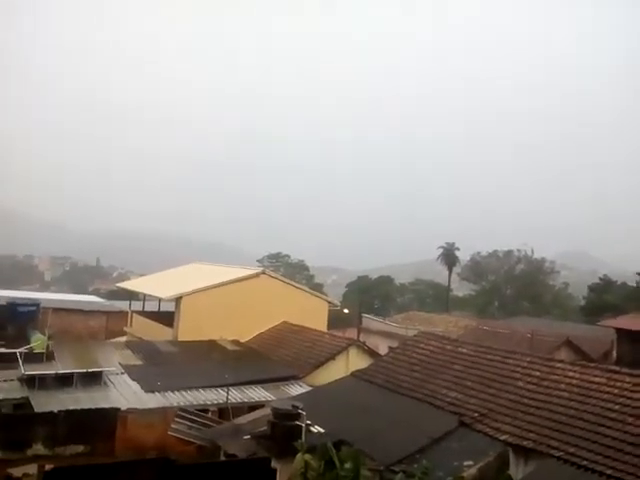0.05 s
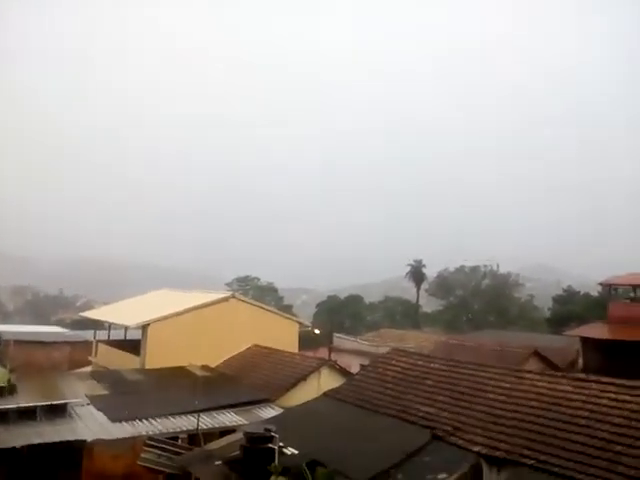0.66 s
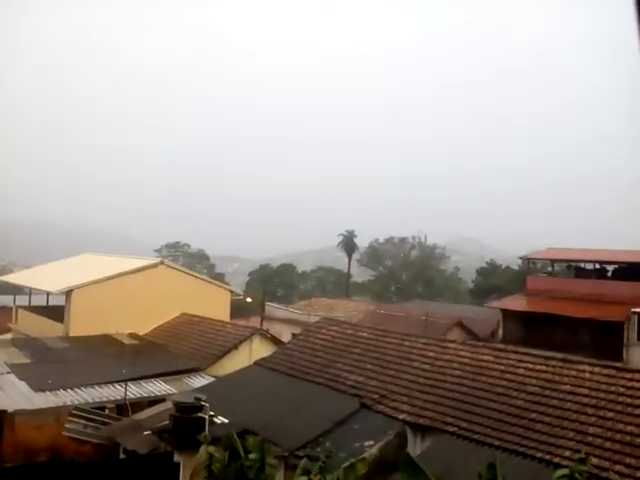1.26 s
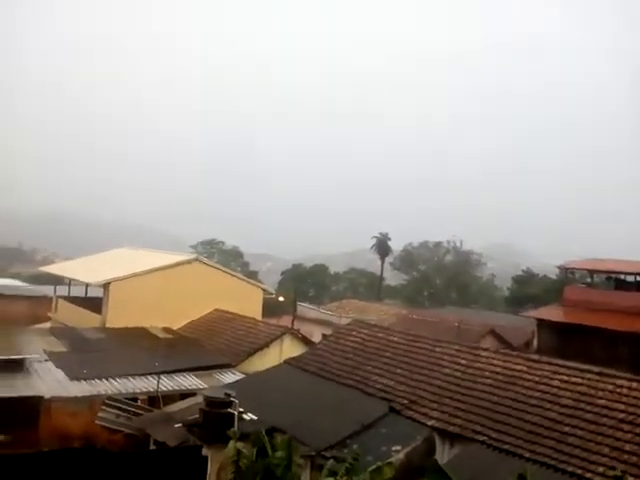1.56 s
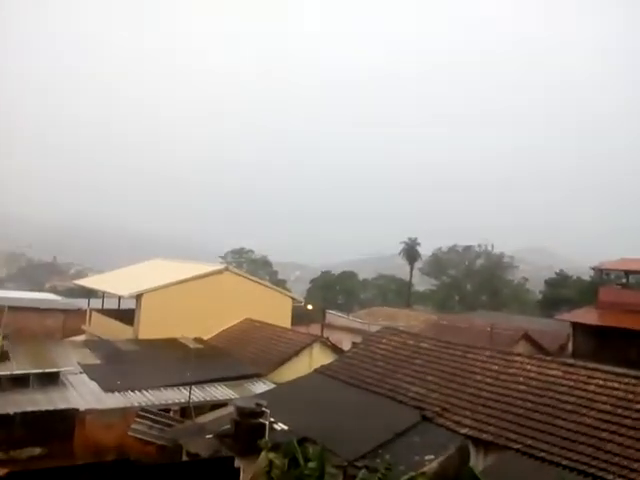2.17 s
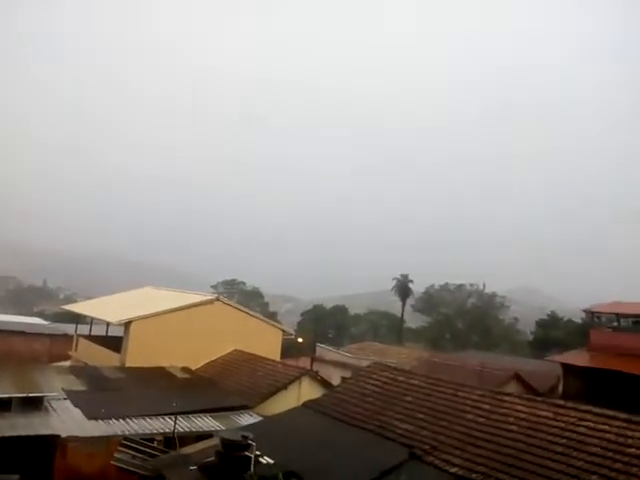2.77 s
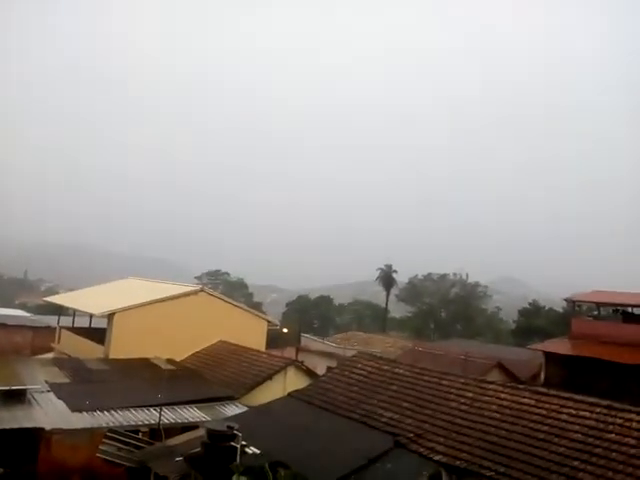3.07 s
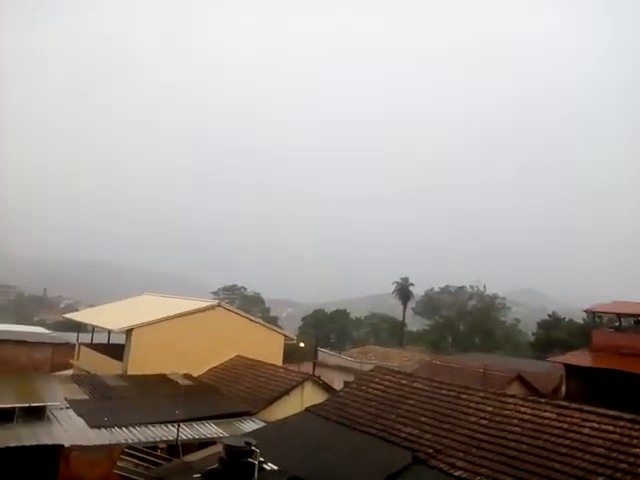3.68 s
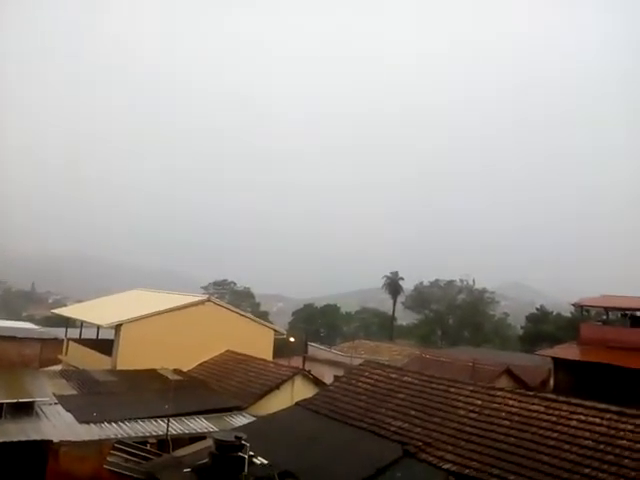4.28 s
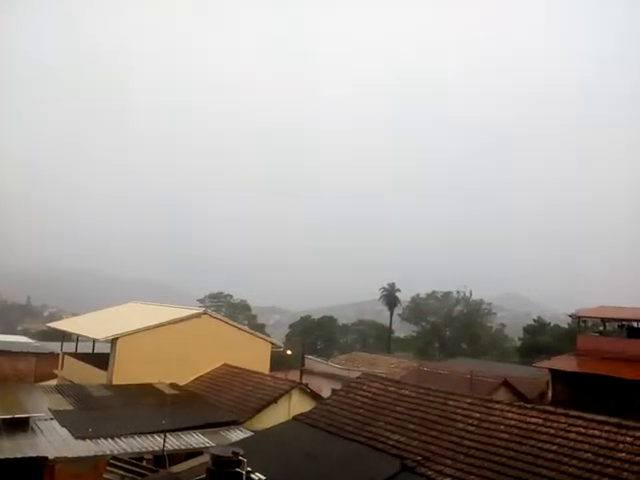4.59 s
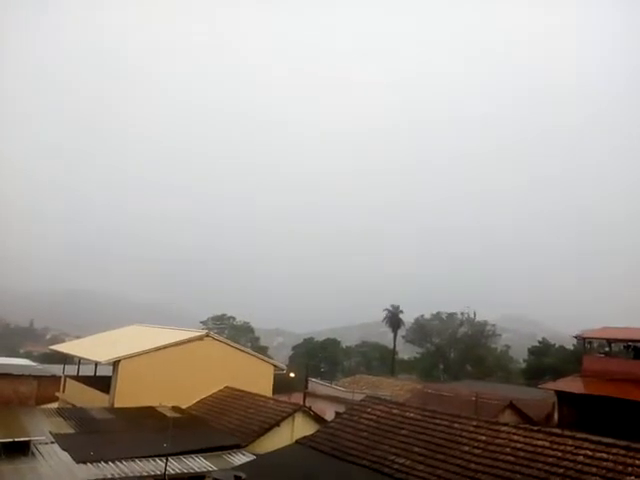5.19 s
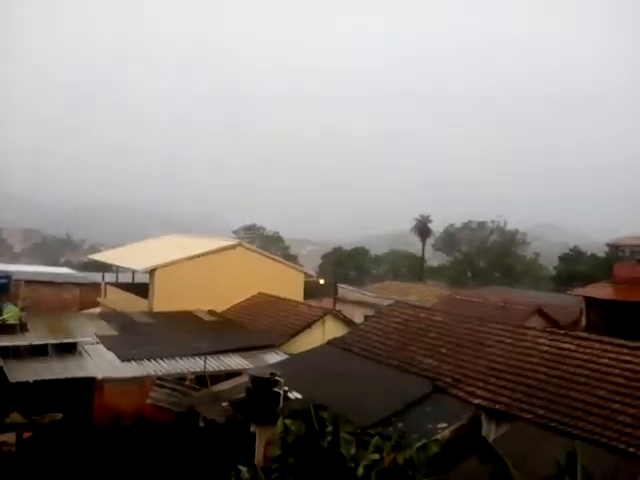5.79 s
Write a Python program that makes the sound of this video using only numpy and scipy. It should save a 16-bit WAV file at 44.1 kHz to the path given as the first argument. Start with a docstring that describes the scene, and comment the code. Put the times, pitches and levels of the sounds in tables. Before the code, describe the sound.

A downpour washes over rooftops all around a handheld microphone, with drops drumming and faintly ringing on sheet roofing. From about one second, clusters of low, hollow knocks and short scrapes come from the left, along with grip rumble and two sharp finger ticks on the right. After three seconds the handling quiets, leaving rain, splashes, one tiny squeak and several heavy drips.

```python
"""Heavy rain on tiled and sheet roofs, heard by a handheld camera with two microphone openings (ports).
Far drops blend into a dense wash; nearer ones patter, ring the roofs and splash up spray,
with a few fat drips and one brief squeak. Something hollow bumps, rattles and scrapes, mostly near the
left port, and the grip rumbles. Fingers tick and brush at the right port, and a limiter turns the
whole sound down for a moment at the loud ticks."""
import sys
import numpy as np
from scipy import signal
from scipy.fft import rfft, irfft
from scipy.io import wavfile
from scipy.ndimage import uniform_filter1d, minimum_filter1d

SR = 44100
rng = np.random.default_rng(int(sys.argv[2]) if len(sys.argv) > 2 else 0)


def generate_wav(sig):
    """Save sig (samples, or channels by samples) to the path in sys.argv[1] as 16-bit PCM at SR."""
    pcm = np.round(np.clip(np.atleast_2d(sig).T, -1, 1) * 32767).astype(np.int16)
    wavfile.write(sys.argv[1], SR, pcm)


N = 266364

# The tone of the rain. Each row: frequency in Hz, left level in dB, right level in dB.
RAIN_TONE = [(30, -87, -77.5), (120, -65, -65), (330, -59.5, -60), (704, -66, -65.5), (807, -63.5, -60.5),
             (1060, -62, -63.5), (1410, -63.5, -64), (1750, -66, -63), (1970, -65, -63), (2240, -61.5, -65),
             (2300, -63, -66.5), (2830, -63, -67), (3980, -66, -66.5), (4570, -67.5, -70), (4900, -74, -68),
             (6000, -73.5, -68.5), (6450, -72, -68.5), (6810, -71.5, -69.5), (8060, -88, -79),
             (9700, -90, -84), (13500, -94, -96.5), (15000, -90, -87.5)]
# How alike the ports hear the rain. Each row: frequency in Hz, likeness from 0 to 1, left lead in radians.
PORT_LIKENESS = [(60, 0.96, 4.5), (283, 0.86, 3), (440, 0.8, 2.5), (630, 0.55, 2), (820, 0.85, 2.5),
                 (1180, 0.16, 1.4), (1265, 0, 0.46), (1600, 0.4, -0.4), (1990, 0.36, 0.4),
                 (2380, 0.34, -2.5), (3150, 0.06, -3.5), (3700, 0.23, -4.5), (5000, 0.03, -9)]
# Ringing sheet roofs. Each row: pitch in Hz, width of the note in Hz, level in dB, balance in dB.
# A balance above zero means louder on the left.
SHEET_ROOFS = [(2017, 140, -43, 5.5), (2744, 46, -49, 12), (1138, 210, -46.5, 5.5)]
# Runs of drops on the nearest sheet. Each row: middle in seconds, level in dB, half length in seconds.
PELT_RUNS = [(1.11, -40, .025), (1.21, -29, .02), (1.415, -36, 0.031)]
# Short hissing surges: splashes of spray, and a few scrapes among the bumps (at 1.353, 1.739 and 2.096 s).
# Each row: middle in seconds, level in dB, half length in seconds, pitch in Hz, gain of that note in dB.
HISS_SURGES = [(0.297, -34, .03, 1900, 3), (0.373, -28, 0.025, 2480, 13), (0.99, -32, 0.0079, 6500, 4),
               (1.353, -25.5, 0.015, 2780, 11), (1.739, -23.5, 0.013, 3170, 1),
               (2.096, -27, 0.079, 2400, -5), (2.128, -41, 0.018, 10500, 6), (2.2, -32, 0.012, 5200, -7),
               (2.264, -23, 0.017, 2850, 5), (2.95, -31, .02, 2700, 1), (3.808, -27.5, 0.015, 3100, -5),
               (3.98, -30, .003, 5800, 0), (4, -25.5, 0.012, 6200, -4), (4.034, -31, .006, 4300, 6),
               (4.282, -30, .02, 3300, -6), (4.498, -26, 0.012, 1600, 12), (4.626, -32, 0.048, 2800, 10),
               (5.14, -28.5, 0.028, 2700, -3), (5.283, -28, 0.019, 2100, 2), (5.35, -29.5, 0.013, 2300, -1),
               (5.42, -30, 0.02, 3900, 2), (5.875, -30, 0.018, 2800, 5)]
# Fat drops. Each row: start in seconds, level in dB, pitch in Hz, seconds to fade by 60 dB, balance in dB.
FAT_DROPS = [(.389, -31, 9100, .04, 5), (4.483, -23, 2300, 0.045, 10), (4.775, -22, 517, 0.047, 12),
             (5.195, -20.5, 2650, .05, 8), (5.288, -23, 2500, .08, 8), (5.822, -22, 2930, 0.13, 12)]
# The path of the squeak. Each row: time in seconds, pitch in Hz.
SQUEAK_PATH = [(3.982, 4550), (3.989, 4550), (3.996, 3450), (4.004, 3200), (4.011, 1200)]
# Blows on the hollow body. Each row: start in seconds, level in dB, rattle fade time in seconds, ring
# against the thud in dB, pitch the struck spot favours in Hz, bright slap in dB, balance in dB.
BLOWS = [(.275, -40, 0.023, -5, 140, -6, -17), (.405, -39.5, 0.07, 3, 157, -12, -1),
         (0.805, -28, 0.053, 5, 225, 1, 24), (0.904, -30.5, 0.064, 6.5, 260, 2, 24),
         (1.003, -23.5, 0.041, -1, 100, -13, 24), (1.268, -23, 0.063, 0.5, 196, -4.5, 26),
         (1.288, -28.5, 0.03, -1, 220, -2, 24), (1.337, -27.5, 0.053, -15, 129, -4, 20),
         (1.362, -32, 0.045, 5, 108, -6, 24), (1.735, -24.5, 0.11, 2, 139, -10, 22),
         (1.751, -28, 0.029, 13, 965, -9, 27), (1.773, -30.5, .025, 7, 144, -14, 20),
         (1.801, -30, 0.051, 8, 900, -2, 22), (2.061, -28, 0.08, 5.5, 173, -7, 24),
         (2.393, -38.5, .02, 4, 147, -14, -4), (2.554, -24.5, 0.06, 5, 230, -4, 20),
         (2.591, -29.5, 0.031, 10.5, 130, -2, 15), (2.619, -32, 0.035, 9.5, 390, -7, 20),
         (2.679, -29.5, 0.02, 1, 327, -7, 20), (2.763, -33, 0.033, -6, 164, -8, 23),
         (3.215, -35, 0.027, 2, 148, -6, -25), (3.376, -38, .08, 7.5, 150, -6, -24),
         (3.931, -49, 0.044, 10, 110, -8, -10), (4.17, -44.5, 0.036, 8.5, 111, -6, -21)]
# The notes of the hollow body. Each row: pitch in Hz, level in dB, seconds to fade by 60 dB.
BODY_NOTES = [(100.2, -5, 0.81), (127.9, 1, 0.56), (154, -1, 0.32), (192, 3.5, 0.19), (226.3, -3, 0.68),
              (270, -11, 0.56), (327, -5, .45), (376, -3, 0.23), (782, -2, 0.25), (968, 1, 0.12),
              (1020, -2, 0.17), (1088, 1, 0.16), (1166, 1, 0.22), (1454, -5, .25)]
# Scrapes among the bumps. Each row: middle in seconds, level in dB, half length in seconds.
SLIDES = [(1.301, -24, .004), (1.337, -22, .005), (1.386, -27, .003), (1.714, -27, 0.0034),
          (1.81, -28, .006), (2.44, -26, .015), (2.575, -22.5, 0.012), (2.607, -30, 0.012),
          (2.665, -30, .009)]
# Finger ticks on the casing. Each row: start in seconds, peak in dB before the limiter.
FINGER_TICKS = [(1.6858, -1.5), (1.6898, -20), (2.3938, 0), (2.4105, -10)]
# Finger brushes. Each row: start in seconds, level in dB, length in seconds.
FINGER_BRUSHES = [(0.196, -24.5, 0.029), (1.8, -30.5, 0.021)]
# The tone of five sounds. Each row: frequency in Hz, level in dB.
HISS_TONE = [(300, -12), (1200, -10), (2200, -2.5), (3100, -0.5), (4200, -3.5), (5000, -8.5), (6600, -4.5),
             (8300, -26.5), (11500, -24.5), (15000, -37)]  # the fizz of spray, hissing scrapes and slaps
THUD_TONE = [(20, -24), (40, -5), (60, -7), (120, -1), (230, 0.5), (310, -7.5), (390, -2.5), (600, -5),
             (1200, -26.5), (4000, -60)]  # the dull part of a bump
CLATTER_TONE = [(150, -33.5), (400, -5), (620, -5), (800, -1.5), (1000, -4.5), (1400, -8.5), (2400, -9.5),
                (4000, -16.5), (8000, -42), (16000, -65)]  # the bright part of a bump
SCRAPE_TONE = [(400, -16), (1300, 0.5), (2400, -9), (3100, 0.5), (4300, -2), (4900, -20), (6500, -7),
               (9000, -41)]  # the body sliding
FINGER_TONE = [(500, -28), (3000, -27), (4100, -3), (5100, 2), (6400, 3), (8000, -24), (9300, -14),
               (13000, -25), (15500, -29)]  # the casing under a fingertip

WAVE_RATES_HZ = (1.1, 9)  # slowest and fastest waves in the spray and on the sheet roofs


def rain():
    """Far drops merge into a wash; near ones patter and ring on tiles. Both reach the two ports."""
    hz = np.fft.rfftfreq(N, 1 / SR)
    swell = gain_of(0.05 * wander(0.27, 12))  # the downpour is almost steady
    near_gain, tile_gain = gain_of(-5), gain_of(-7)
    washes = []
    for _ in range(2):
        tiles = 0
        for ring_hz in np.geomspace(450, 6500, 24):
            ring = 1 / (1 + 1j * 9 * (hz / ring_hz - ring_hz / (hz + 1)))  # a tile rings for a few cycles
            tiles = tiles + rfft(drops(per_s=70, spread_db=1.0)) * ring
        wash = evened(rng.standard_normal(N) + near_gain * drops(per_s=1500, spread_db=1.0))
        washes.append(swell * (wash + tile_gain * irfft(tiles, N)) / np.hypot(1, tile_gain))
    left = rfft(patchy(washes[0], patch_db=1.62, flicker_db=1.0))  # the left port faces the gustier side
    other = rfft(patchy(washes[1], patch_db=0.68, flicker_db=1.34))
    likeness = np.clip(look_up(PORT_LIKENESS, hz), 0, 1)
    lag = np.exp(-1j * look_up(PORT_LIKENESS, hz, column=2))
    right = (likeness * left + np.sqrt(1 - likeness ** 2) * other) * lag
    ports = [left * gain_of(look_up(RAIN_TONE, hz)), right * gain_of(look_up(RAIN_TONE, hz, column=2))]
    return gain_of(-0.5) * np.sqrt(SR / 2) * irfft(np.array(ports), N)


def patchy(x, patch_db, flicker_db):
    """Rain lands in clumps: patches of time and pitch swell, and the treble flickers."""
    hz, _, grid = signal.stft(x, SR, nperseg=512, noverlap=384)  # pitch down the rows, time across
    patches = rng.standard_normal(grid.T.shape).T
    for _ in range(2):
        patches = uniform_filter1d(uniform_filter1d(patches, size=14, axis=1), size=7, axis=0)
    flicker = np.interp(np.linspace(0, N, grid.shape[1]), np.arange(N), wander(0.63, 46))
    treble = np.minimum(hz / 9000, 1)[:, None]
    grid = grid * gain_of(patch_db * evened(patches) + flicker_db * treble * flicker)
    return signal.istft(grid, SR, nperseg=512, noverlap=384)[1][:N]


def sheets():
    """Drops drum on sheet roofs, each with one broad note; the drumming comes in waves and slowly eases."""
    t, out = np.arange(N) / SR, np.zeros((2, N))
    swing_db, ease_db_per_s = 1.5, 2.07
    for hz, width, db, balance_db in SHEET_ROOFS:
        ring = ringing(drops(per_s=350, spread_db=2.5), hz, sharpness=hz / width)
        waves_db = swing_db * wander(*WAVE_RATES_HZ) - ease_db_per_s * (t - t.mean())
        out += panned(balance_db) * gain_of(db + waves_db) * evened(ring)
    return out


def pelts():
    """Runs of drops swell on the nearest sheet and bring out its note."""
    hz, width_hz = 2030, 320
    ring = drops(per_s=1700, spread_db=-1.0)
    for _ in range(2):
        ring = ringing(ring, hz, sharpness=hz / width_hz)
    level = sum(hump(*run) for run in PELT_RUNS)
    return panned(balance_db=8) * level * evened(ring)


def hiss():
    """Mostly on the left, fine spray comes and goes; splashes and a few scrapes hiss in short surges."""
    fizz = np.array([evened(colour(drops(per_s=9000, spread_db=1.5), HISS_TONE)) for _ in range(2)])
    usual_db, swing_db = -43.5, 3.5
    out = fizz * gain_of(usual_db + swing_db * np.tanh(wander(*WAVE_RATES_HZ)))
    for s, db, half, hz, note_db in HISS_SURGES:
        note = gain_of(note_db) * ringing(fizz, hz, sharpness=3.5)
        out += hump(s, db, half) * evened(fizz + note)
    return out * panned(balance_db=6)


def drips():
    """A fat drop rings four close, quickly dying notes; its soft splat rounds off the start."""
    t, out = np.arange(int(.15 * SR)) / SR, np.zeros((2, N))
    soft_start = 1 - np.exp(-t / 0.0033)
    for s, db, hz, fade_s, balance_db in FAT_DROPS:
        pitches = hz + rng.normal(0, 80, size=4)
        phases = rng.uniform(0, 2 * np.pi, size=4)
        ring = sum(np.sin(2 * np.pi * pitch * t + phase) for pitch, phase in zip(pitches, phases)) / 2
        add(out, s, panned(balance_db) * gain_of(db - 60 * t / fade_s) * soft_start * ring)
    return out


def squeak():
    """A short, rough whistle slides down in pitch during a splash of spray."""
    level_db, roughness = -30, 0.077
    times, pitches = np.transpose(SQUEAK_PATH)
    t, out = np.arange(times[0], times[-1], 1 / SR), np.zeros((2, N))
    hz = np.interp(t, times, pitches) * (1 + roughness * wander(100, 1500)[:len(t)])
    tone = evened(np.sin(2 * np.pi * np.cumsum(hz) / SR) * signal.windows.tukey(len(t), .1))
    add(out, times[0], panned(balance_db=10) * gain_of(level_db) * tone)
    return out


def bumps():
    """Each blow rings the hollow body and sets off a dying rattle; harder blows are brighter."""
    t, out = np.arange(int(.7 * SR)) / SR, np.zeros((2, N))
    hard_blow_db, slap_fade_s = -21, 0.027
    shove_hz, shove_peak_s = 150, 0.0029  # a hard blow shoves the whole body for a cycle or two
    shove = t / shove_peak_s * np.exp(1 - t / shove_peak_s) * np.sin(2 * np.pi * shove_hz * t)
    for s, db, rattle_s, ring_db, spot_hz, slap_db, balance_db in BLOWS:
        force_db, early = db - hard_blow_db, round(rattle_s * SR)
        contacts = drops(per_s=1600, spread_db=1.34)[:len(t)] * np.exp(-t / rattle_s)
        contacts[0] += 8  # the blow itself, ahead of the smaller contacts
        thud, clatter = colour(contacts, THUD_TONE), colour(contacts, CLATTER_TONE)
        slap = evened(colour(rng.standard_normal(len(t)), HISS_TONE)) * np.exp(-t / slap_fade_s)
        bright = gain_of(0.5) * clatter / clatter[:early].std() + gain_of(slap_db) * slap
        sound = thud / thud[:early].std() + gain_of(ring_db) * body_ring(t, spot_hz)
        sound += gain_of(0.11 * force_db) * bright
        sound += gain_of(6 + 0.42 * force_db) * shove
        add(out, s, gain_of(db) * panned(balance_db) * sound)
    return out


def body_ring(t, spot_hz):
    """The hollow body's notes build up and fade; those far from the struck spot's pitch are weaker."""
    ring = 0
    for hz, db, fade_s in BODY_NOTES:
        weaker_db = 13 * np.tanh(2.6 * np.log2(hz / spot_hz)) ** 2
        ring = ring + gain_of(db - weaker_db - 60 * t / fade_s) * np.sin(2 * np.pi * hz * t)
    return ring * (1 - np.exp(-t / 0.0093))


def scrapes():
    """The hollow body slides a little: a quick run of tiny slips."""
    slips = evened(colour(drops(per_s=3000, spread_db=2.5), SCRAPE_TONE))
    level = sum(hump(*slide) for slide in SLIDES)
    return panned(balance_db=20) * level * slips


def touches():
    """A fingertip on the casing at the right port: single ticks, or a short brush of slips."""
    out, ports = np.zeros((2, N)), panned(balance_db=-28)
    tick = colour(signal.unit_impulse(256), FINGER_TONE)
    for s, db in FINGER_TICKS:
        add(out, s, ports * gain_of(db) * tick / abs(tick).max())
    for s, db, length in FINGER_BRUSHES:
        count = round(length * SR)
        slips = rng.standard_normal(count) * signal.windows.tukey(count, .5)
        add(out, s, ports * gain_of(db) * evened(np.convolve(slips, tick)))  # the casing rings
        add(out, s, ports * gain_of(db - 7) * evened(np.diff(slips)))  # the skin hisses thinly
    return out


def rumble():
    """The grip makes a faint, lumpy rumble, unrelated at the two ports; the hand stirs around each bump."""
    t = np.arange(N) / SR
    rest_db, stir_db, settle_s = -58.5, -15.5, 0.28
    stir = np.max([gain_of(db) * np.exp(-abs(t - s) / settle_s) for s, db, *_ in BLOWS], axis=0)
    level = gain_of(rest_db) + gain_of(stir_db) * stir
    lumps = np.array([evened(colour(drops(per_s=300, spread_db=1.5), THUD_TONE)) for _ in range(2)])
    return level * lumps * panned(balance_db=3)


def drops(per_s, spread_db):
    """Tiny hits at random times; a few are larger than the rest (smaller if the spread is negative)."""
    size = gain_of(spread_db * np.minimum(rng.exponential(1, N), 4.5))
    return evened(size * rng.choice([-1, 1], N) * (rng.random(N) < per_s / SR))


def wander(low_hz, high_hz):
    """A random wobble between two rates, of typical size 1."""
    hz = np.fft.rfftfreq(N, 1 / SR)
    band = rfft(rng.standard_normal(N)) * (hz > low_hz) * (hz < high_hz)
    return evened(irfft(band / np.sqrt(hz + low_hz), N))


def hump(middle_s, db, half_s):
    """A level that rises and falls in a bell shape."""
    t = np.arange(N) / SR
    return gain_of(db) * np.exp(-.5 * ((t - middle_s) / half_s) ** 2)


def ringing(x, hz, sharpness):
    """Makes a sound ring at one pitch; sharper rings longer."""
    return signal.lfilter(*signal.iirpeak(hz, sharpness, fs=SR), x)


def colour(x, tone):
    """Gives a sound the tone in a table, without ringing ahead of a hit."""
    size = 8192
    log_gain = np.log(gain_of(look_up(tone, abs(np.fft.fftfreq(size, 1 / SR)))))
    response = np.fft.ifft(np.exp(np.conj(signal.hilbert(log_gain)))).real[:size // 2]
    return signal.fftconvolve(x, response)[:len(x)]


def look_up(table, hz, column=1):
    """Reads a table at any frequency, filling in between its rows."""
    columns = np.transpose(table)
    return np.interp(np.log(hz + 1), np.log(columns[0] + 1), columns[column])


def gain_of(db):
    """Turns decibels into a number to multiply by."""
    return 10 ** (np.asarray(db) / 20)


def evened(x):
    """Scales a sound to an average strength (rms) of 1."""
    return x / np.sqrt(np.mean(x ** 2) + 1e-20)


def panned(balance_db):
    """Left and right gains: the far port is turned down."""
    return gain_of([[min(balance_db, 0)], [min(-balance_db, 0)]])


def add(mix, s, sound):
    """Lays a two-channel sound into the mix at s seconds."""
    part = mix[:, max(round(s * SR), 0):][:, :sound.shape[1]]
    part += sound[:, :part.shape[1]]


def scene():
    """The rain all around, plus the small noises at the camera."""
    return (rain() + sheets() + pelts() + hiss() + drips() + squeak()
            + bumps() + scrapes() + rumble() + touches())


def record(dry):
    """The microphone loses deep bass, a limiter dips both sides around loud peaks, the top treble is cut."""
    bass_hz, treble_hz = 42, 15500
    ceiling_db, hold_s, ramp_s = -5.2, .028, .006
    dry = signal.sosfilt(signal.butter(2, bass_hz, "high", fs=SR, output="sos"), dry)
    needed_db = np.minimum(ceiling_db - 20 * np.log10(abs(dry).max(0) + 1e-9), 0)
    hold = int(hold_s * SR)
    held_db = minimum_filter1d(needed_db, hold, origin=hold // 20)  # starts just ahead of the peak
    dip_db = uniform_filter1d(held_db, int(ramp_s * SR))
    low_pass = signal.firwin(511, treble_hz, window=("kaiser", 8), fs=SR)
    return signal.oaconvolve(dry * gain_of(dip_db), low_pass[None], "same")


dry = scene()
out = record(dry)
generate_wav(out)
```